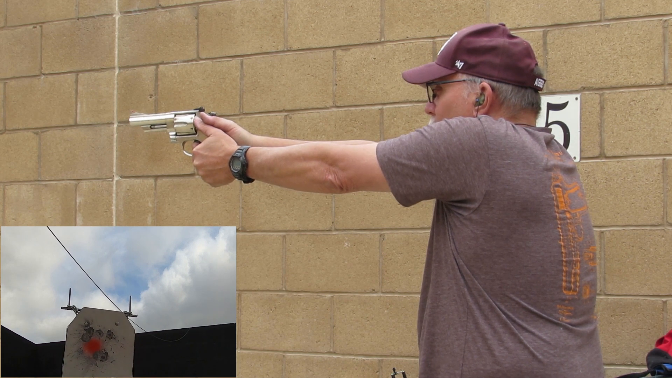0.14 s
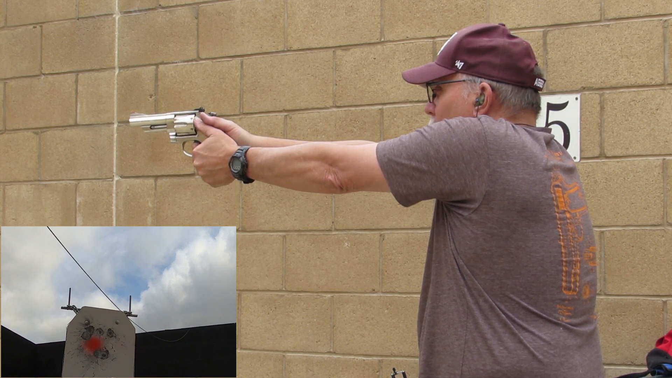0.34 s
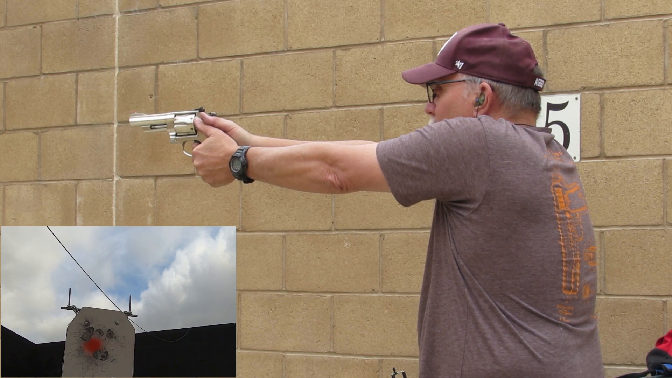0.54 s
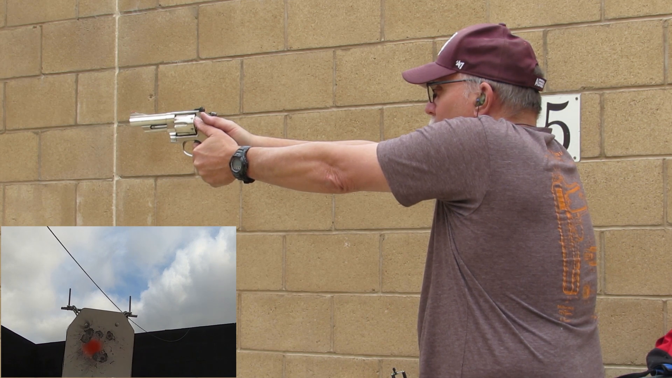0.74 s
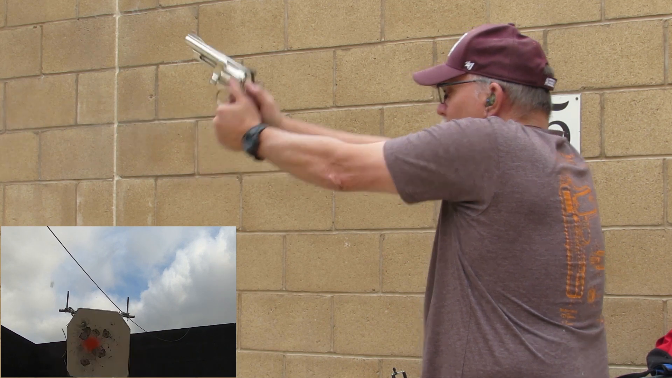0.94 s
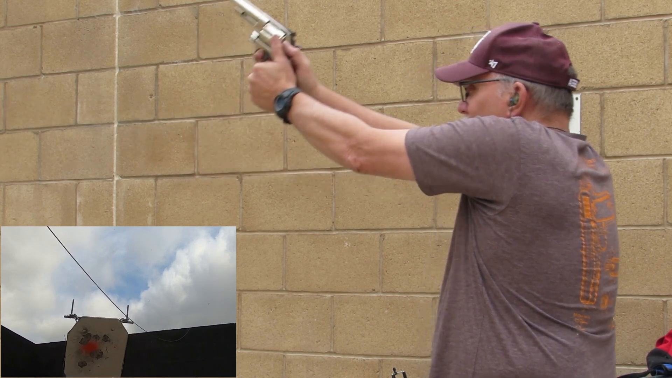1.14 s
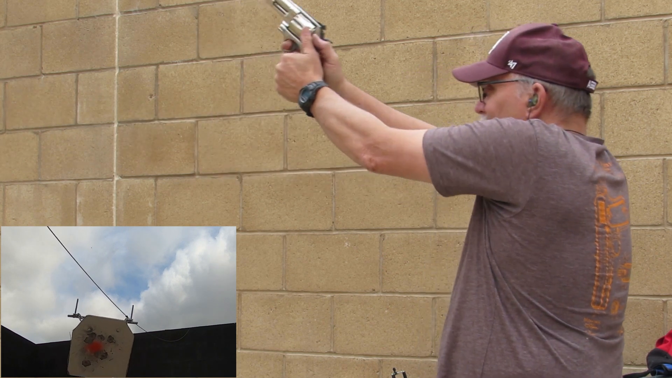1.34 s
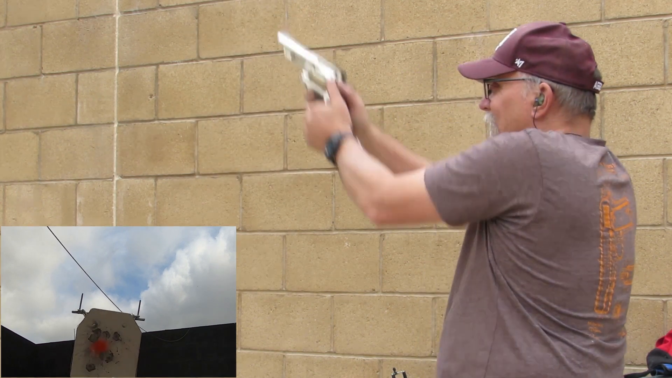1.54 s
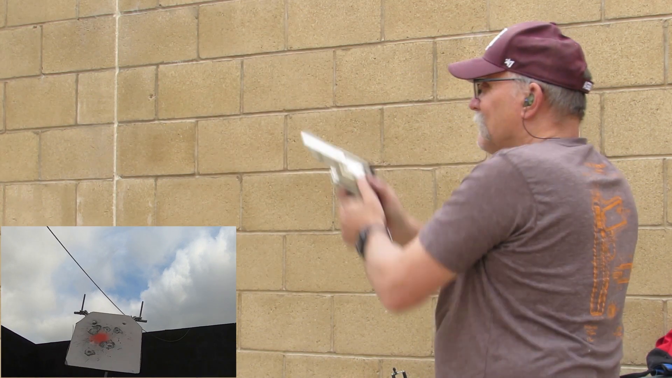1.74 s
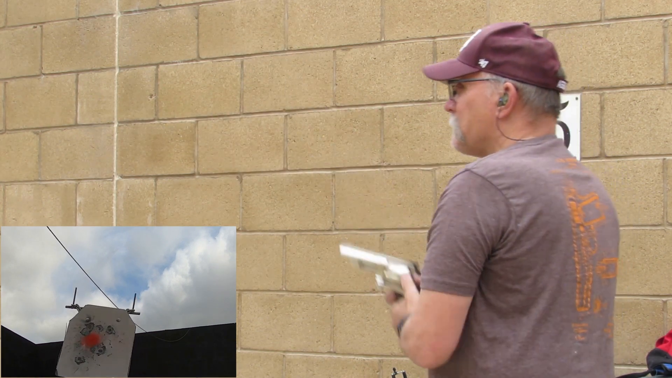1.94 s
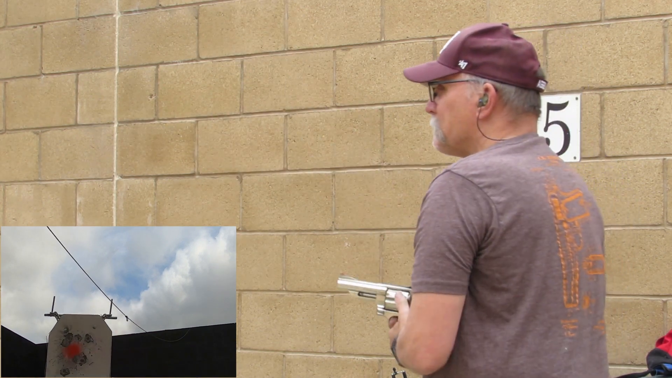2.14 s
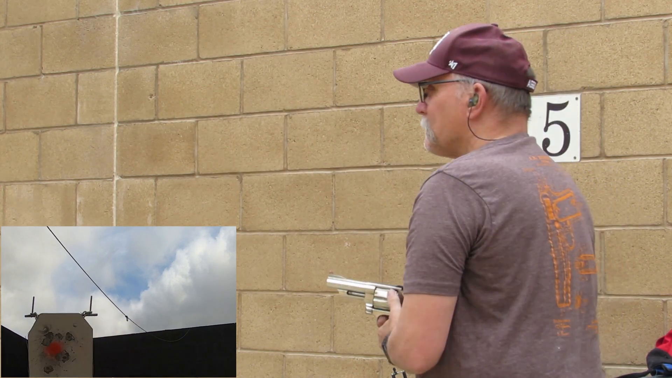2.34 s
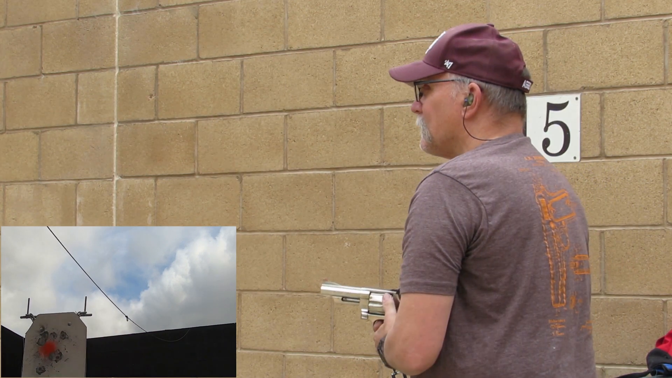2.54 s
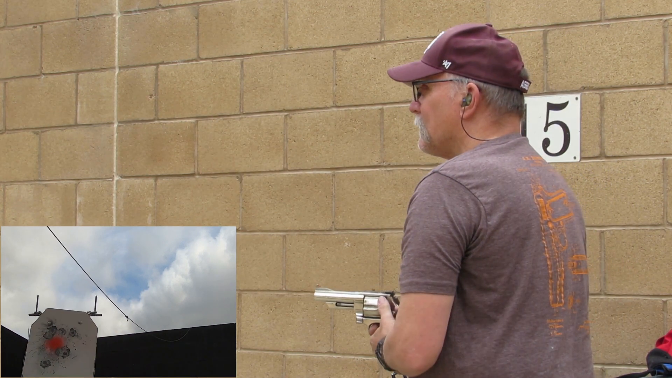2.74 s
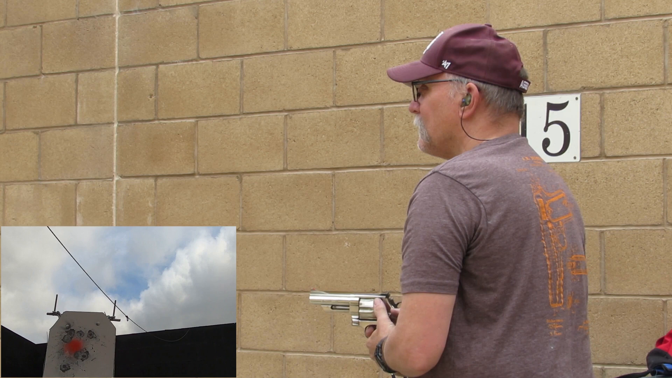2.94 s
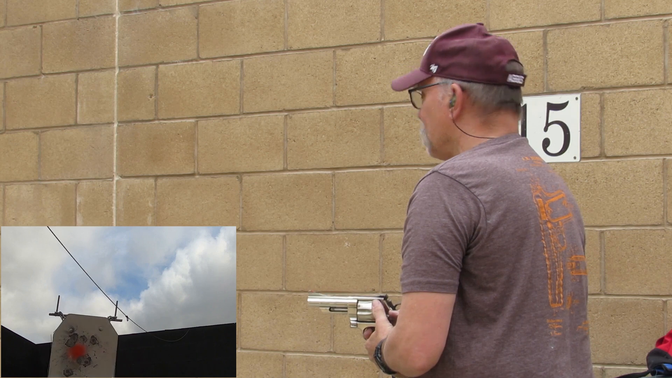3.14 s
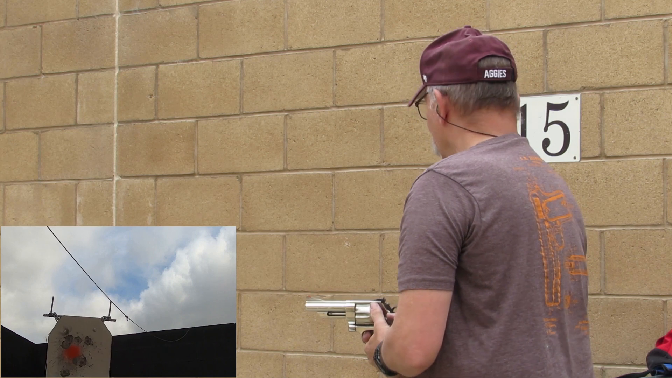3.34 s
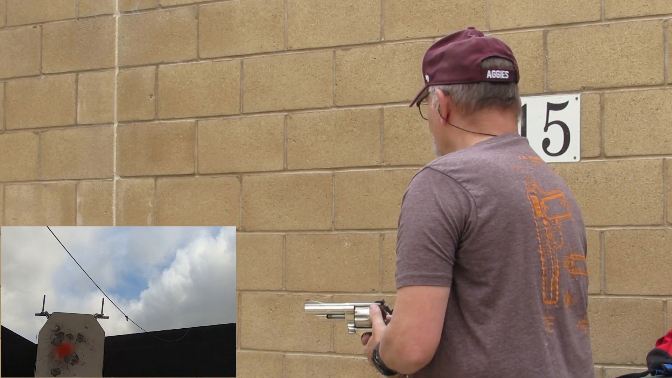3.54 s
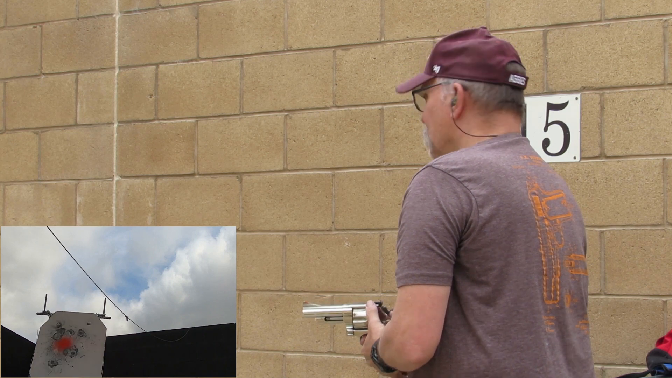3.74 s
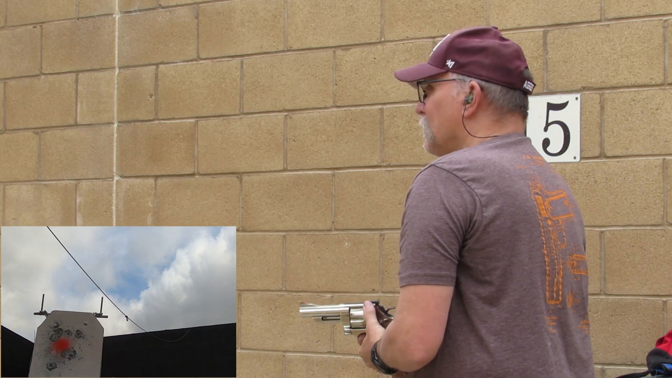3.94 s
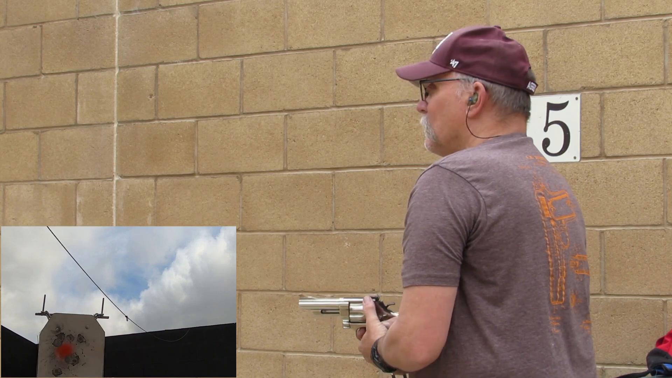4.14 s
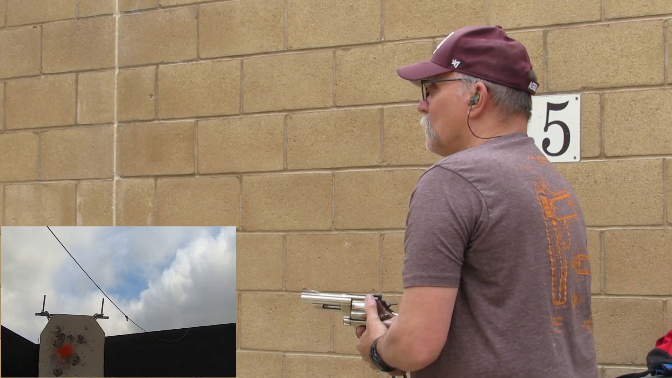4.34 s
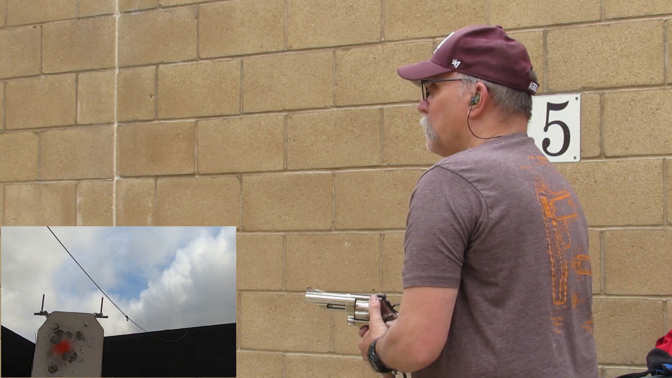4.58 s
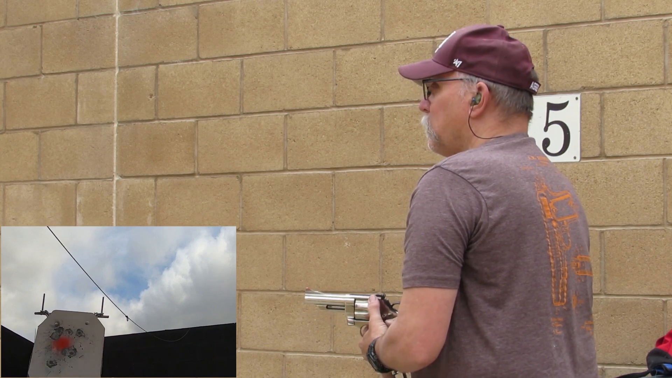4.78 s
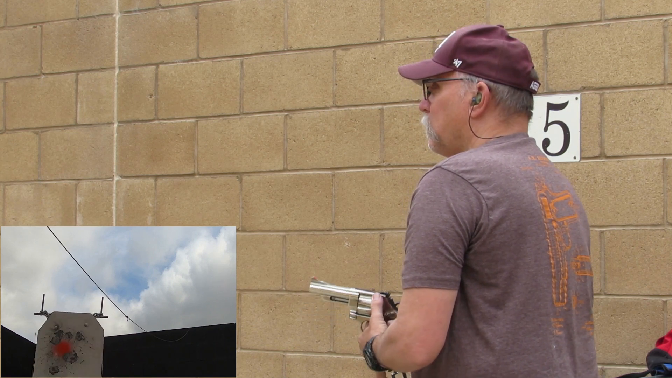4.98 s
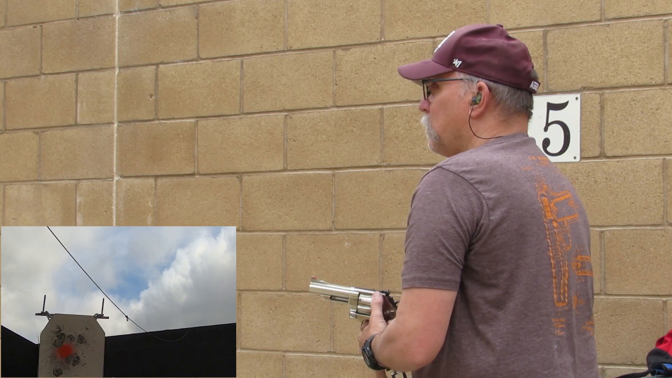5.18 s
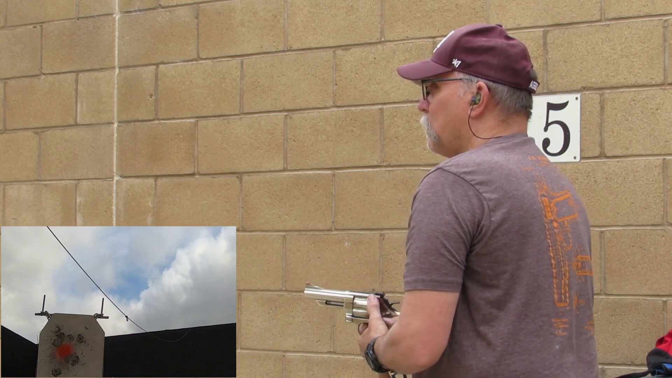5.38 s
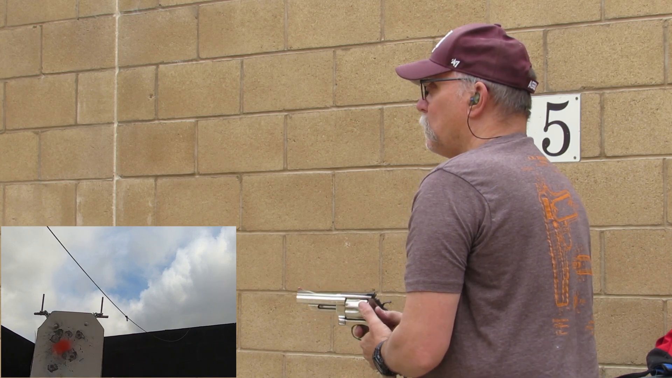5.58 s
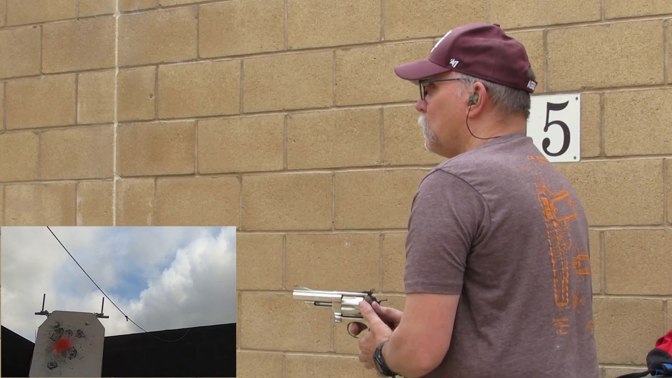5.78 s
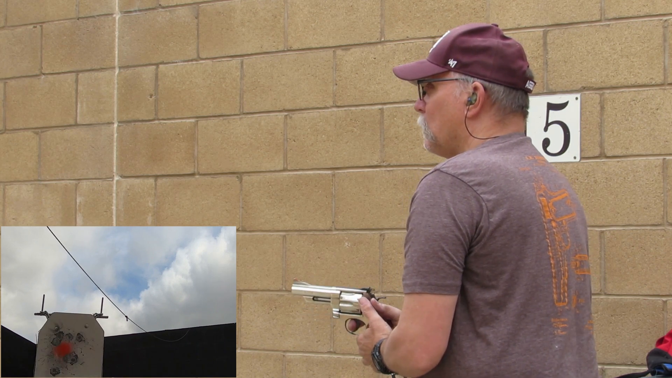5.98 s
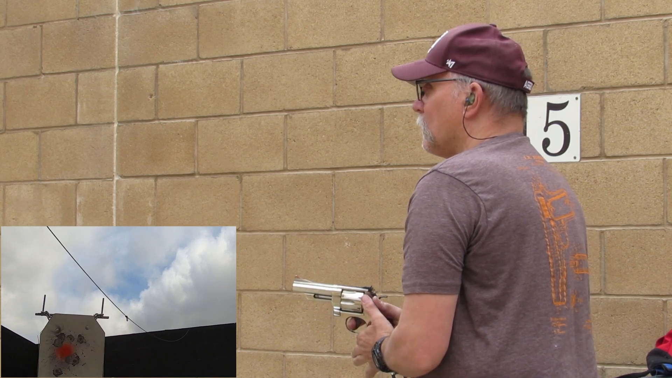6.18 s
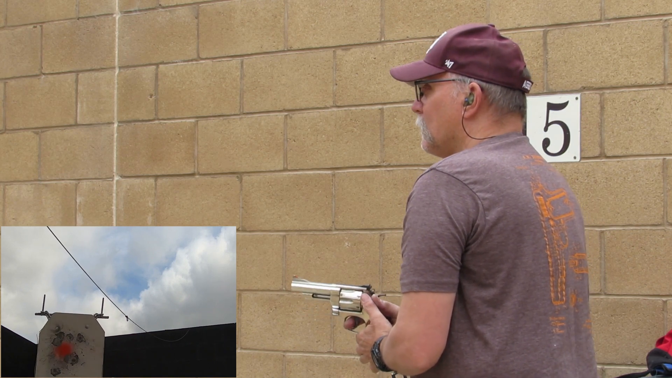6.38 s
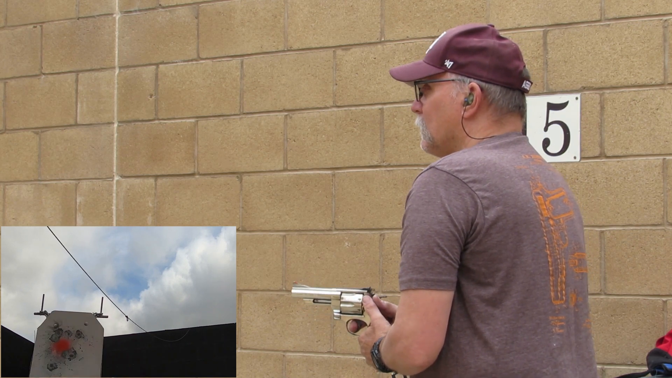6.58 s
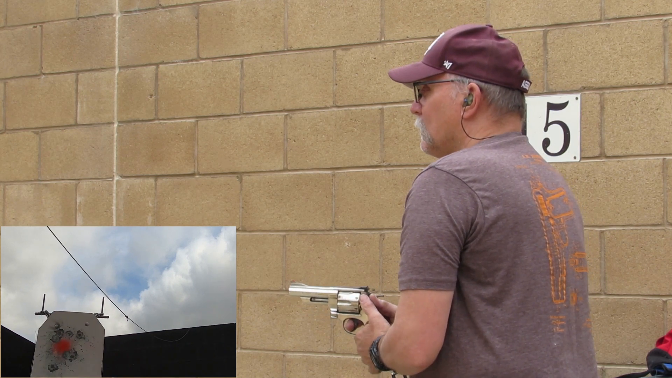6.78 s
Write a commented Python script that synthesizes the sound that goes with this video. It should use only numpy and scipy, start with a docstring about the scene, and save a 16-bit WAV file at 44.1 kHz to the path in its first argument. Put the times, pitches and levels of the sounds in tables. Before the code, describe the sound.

After small metallic clicks, one violent handgun blast slaps off walls, rolls and rings out, leaving fluttering pulses, soft rubbing and distant hum.

```python
"""Far machinery drones over the air's rumble and hiss; a revolver's lock clicks and its hammer falls.
The shot, in a block-walled bay of an outdoor range, overloads the microphone and the background sinks.
After a brief hush come slaps, a wash and a long roll of noise, ringing tones and a gust of stirred air.
Later pulses flutter between the walls, and something rubs and scrapes in fits and squeals once:
perhaps clothing or a holster, made of noise through narrow resonances."""
import sys
import numpy as np
from scipy import signal
from scipy.io import wavfile
from scipy.ndimage import uniform_filter1d

SR = 44100
rng = np.random.default_rng(int(sys.argv[2]) if len(sys.argv) > 2 else 0)


def file_out(sig):
    """Save sig as 16-bit WAV at sys.argv[1]."""
    # one column per channel
    cols = np.atleast_2d(sig).T
    # limit, then scale
    lim = np.clip(cols, -1, 1)
    pcm = np.round(lim * 32767).astype(np.int16)
    wavfile.write(sys.argv[1], SR, pcm)


N = 300762
TIME = np.arange(N) / SR
SHOT_S = 0.7876
ECHO_START_S = 0.868   # wash and roll begin


def from_db(db):
    """Turn decibels into a gain."""
    return 10 ** (np.asarray(db) / 20)


def rms_one(x):
    """Scale a signal to an rms (average strength) of 1."""
    return x / np.sqrt(np.mean(x ** 2) + 1e-20)


def level(rows):
    """Gain over time from rows of seconds and dB; silent outside their span."""
    rows = np.array(rows)
    return from_db(np.interp(TIME, rows[:, 0], rows[:, 1], left=-200, right=-200))


def at_hz(points, hz):
    """Read a table between its rows, on a log-frequency axis."""
    points = np.array(points)
    return np.interp(np.log(hz), np.log(points[:, 0]), points[:, 1])


def cut(x, hz, kind, order=2):
    """Butterworth filter: keep only the low, high or band part."""
    sections = signal.butter(order, np.clip(hz, 10, .47 * SR), kind, fs=SR, output="sos")
    return signal.sosfilt(sections, x + 1e-18)


def resonate(x, hz, width_hz):
    """A two-pole resonance of unit height: the narrower, the longer it rings."""
    r = np.exp(-np.pi * width_hz / SR)
    feed = np.array([1, 0, -1]) * (1 - r * r) / 2
    return signal.lfilter(feed, [1, -2 * r * np.cos(2 * np.pi * hz / SR), r * r], x + 1e-18)


def drift(rate):
    """Random wander of rms 1 that gets a new target `rate` times a second."""
    return rms_one(np.interp(TIME * rate, np.arange(4096), rng.standard_normal(4096)))


def fade(t, t60):
    """Exponential decay from t = 0 that loses 60 dB in t60 seconds."""
    return (t >= 0) * np.exp(-np.log(1000) * np.clip(t / t60, 0, 10))


def pair(two, alike):
    """Turn two unrelated signals into left and right of a given likeness (-1 opposite, 1 same)."""
    alike = np.clip(alike, -.99, .99)
    middle = np.sqrt(1 + alike) * two[0]
    side = np.sqrt(1 - alike) * two[1] * np.array([[1], [-1]])
    return (middle + side) / np.sqrt(2)


def add(out, s, sound):
    """Mix a short sound in at s seconds."""
    i = round(s * SR)
    out[:, i:i + sound.shape[-1]] += sound[..., :N - i]


def noise(colour, likeness, grain_db=0, shape=lambda hz: 1):
    """Half-octave bands of grainy stereo noise; rms 1 before `shape` scales each band."""
    white = rng.standard_normal((2, 2, N)) * rms_one(from_db(grain_db * drift(550)))
    edges = np.geomspace(22, 17000, 21)
    out, power = 0, 0
    for k, band in enumerate(zip(edges, edges[1:])):
        hz = np.sqrt(band[0] * band[1])
        stereo = pair(cut(white[k % 2], band, "band"), at_hz(likeness, hz))
        part = from_db(at_hz(colour, hz)) * stereo
        out = out + part * shape(hz)
        power = power + np.mean(part ** 2)
    return out / np.sqrt(power)


def envelope(start, rise_s, hold_s, sag_db_per_s, fall_db_per_s):
    """Gain that swells, sags until hold_s after its start, then falls away."""
    age = np.maximum(TIME - start, 0)
    sag_db = sag_db_per_s * np.minimum(age, hold_s)
    fall_db = fall_db_per_s * np.maximum(age - hold_s, 0)
    return np.minimum(age / rise_s, 1) ** 2 * from_db(-sag_db - fall_db)


def blast(swing_db=9, recover_s=0.00099, gas_db=-6, gas_t60=0.018,
          puff_db=-12, puff_s=0.0021, suction_db=-30, suction_s=.014):
    """The blast throws the microphone to its stop; shocks and hot gas ride on it, then puff and suction."""
    # Shock fronts from the gun and the nearest surfaces.
    # Each row: start in seconds, strength in dB, length in ms.
    shocks = [(0.788, 7.5, 0.22), (0.789, 1.5, 0.2), (0.7918, -3.5, 0.16), (0.8086, -7, .3),
              (0.8118, -27, 0.45)]
    t = TIME - SHOT_S
    out = -from_db(swing_db) * (t >= 0) * np.exp(-np.abs(t) / recover_s) * np.ones((2, 1))
    gas = cut(pair(rng.standard_normal((2, N)), 0.48), 12000, "low", order=1)
    out += from_db(gas_db) * fade(t, gas_t60) * gas
    for s, db, length_ms in shocks:
        age = np.maximum((TIME - s) * 1000, 0) / length_ms
        # a short push, then a shallow pull
        out += from_db(db) * (age > 0) * np.where(age < 1, 1, -.25 * np.exp(-age / 4))
    for s, db, sign, rise_s in [(0.7992, puff_db, 1, puff_s), (0.8, suction_db, -0.72, suction_s)]:
        # the right side gets it 1.3 ms later
        age = np.maximum(TIME - s - np.array([[0], [.0013]]), 0) / rise_s
        out += sign * from_db(db) * age ** 2 * np.exp(2 - 2 * age)
    return cut(out, 13000, "low", order=1)


def lockwork():
    """Small steel parts snap home and ring briefly: bursts of metal-coloured noise."""
    # Clicks. Each row: start in seconds, relative level in dB, time to fade by 60 dB in seconds.
    clicks = [(0.3493, -26.5, 0.017), (0.359, -36, 0.027), (0.372, -43, 0.06), (0.7805, -21.5, 0.012),
              (0.781, -15.5, 0.023), (0.7848, -21.5, 0.042), (5.502, -48, .06)]
    # Colour of the steel. Each row: frequency in Hz, relative level in dB.
    steel = [(800, -18.5), (2000, -11.5), (3000, 1), (5000, -19), (7500, -10), (10000, -2), (12500, 4),
             (15500, -16)]
    blows = sum(from_db(db - 5.0) * fade(TIME - s, t60) for s, db, t60 in clicks)
    return blows * noise(steel, [(1000, 0.97)])


def thump(t, hz, cycles):
    """A shock rounded by its journey: pressure swells, swings and dies."""
    age = t * hz / cycles
    return np.sin(2 * np.pi * hz * t) * age * np.exp(1 - age)


def slaps(thump_db=-4, cycles=0.4, crack_db=12, crack_s=0.00043, scatter_db=8, scatter_t60=0.012,
          scatter_rise_s=0.0012, blur_per_s2=105, glance_db=-8, glance_s=0.0037):
    """Each surface returns a thump, a sharp front and a spray of scatter; late fronts are weaker."""
    # Echoes from walls and baffles. Each row: start in seconds, relative thump level in dB, thump
    # pitch in Hz, relative crack level in dB, top of the crack in Hz, left minus right in dB.
    echoes = [(0.9023, -24, 144, -26, 13000, -2), (0.905, -6.5, 390, -21, 10000, -3),
              (0.9095, -17, 300, -21, 6000, 3), (0.9128, -10, 300, -19, 12000, -4),
              (0.916, -5, 202, -19, 10000, -1), (0.9202, -13, 248, -22, 6000, -6),
              (0.9235, -17, 80, -13, 15000, 0), (0.926, -13, 570, -16, 9100, -3),
              (0.9307, -14, 190, -13, 9000, -2), (0.963, 0.5, 193, -19, 9000, 1),
              (0.973, -9, 209, -24, 9000, -1), (0.9988, -5, 107, -19, 9000, 2),
              (1.011, -2, 412, -30, 9000, -2), (1.048, -8, 480, -36, 9000, -6),
              (1.051, -13, 85, -7.5, 16200, 13), (1.0597, -7.5, 252, -24, 9000, -13),
              (1.087, -6, 355, -14, 7000, -9.5), (1.0911, -5, 248, -32, 5000, 11),
              (1.0984, -12, 353, -20.5, 7000, -14), (1.124, -8.5, 350, -21, 7000, 13),
              (1.133, -7, 408, -18, 7000, 0), (1.1401, -3.5, 310, -36, 5000, 0),
              (1.1486, -6, 338, -17.5, 5900, 7), (1.1773, -5.5, 340, -13, 6000, -3),
              (1.1878, -22, 298, -16, 5000, -9), (1.2167, -9.5, 384, -28, 6000, 6),
              (1.2275, -7, 384, -11.5, 4800, 6), (1.2386, -5.5, 368, -16, 4850, 3.5),
              (1.245, -12, 302, -34, 4000, 0), (1.268, -8, 340, -11, 8850, -7),
              (1.279, -21, 403, -14.5, 8400, -9), (1.308, -12, 350, -24, 5000, -1),
              (1.317, -19, 318, -13.5, 5950, 8), (1.3287, -18, 405, -10, 3430, 4),
              (1.358, -16, 367, -14, 5000, -3), (1.3693, -21, 368, -10.5, 5160, -5),
              (1.3728, -19, 370, -15, 6000, -5), (1.399, -14, 304, -13, 5700, -1),
              (1.408, -14, 328, -16, 4000, 6), (1.4201, -31, 355, -15.5, 3500, 1),
              (1.427, -17, 356, -29, 4000, 0), (1.45, -24, 400, -22, 5000, -5),
              (1.460, -31, 400, -19, 3500, -7), (1.470, -32, 400, -19, 6000, 0),
              (1.492, -19, 350, -36, 4000, 3), (1.503, -17.5, 375, -24, 4000, 6),
              (1.527, -20, 377, -16, 5100, 4), (1.5524, -27, 406, -18, 4000, -2),
              (1.5928, -20, 400, -26, 4000, 7), (1.609, -16, 380, -38, 3000, 0),
              (1.643, -34, 380, -31, 3500, 0)]
    out, t = np.zeros((2, N)), TIME[:SR // 10]
    for s, db, hz, front_db, top_hz, pan_db in echoes:
        blurred = from_db(crack_db - blur_per_s2 * (s - 0.92) ** 2)
        front = (1 - t / crack_s) * np.exp(-t / crack_s) * blurred
        scatter = pair(rng.standard_normal((2, len(t))), 0.24)
        scatter = scatter * fade(t, scatter_t60) * np.minimum(t / scatter_rise_s, 1)
        scatter = from_db(scatter_db) * cut(scatter, [750, 2300], "band", order=1)
        crack = cut(from_db(front_db) * (front + scatter), top_hz, "low", order=4)
        boom = from_db(db + thump_db) * thump(t, hz, cycles)
        add(out, s, (crack + boom) * from_db(np.array([[.5], [-.5]]) * pan_db))
        # a second, glancing path brings the thump again, wide and a little later
        wide = boom * np.array([[1], [-1]]) * rng.choice([-1, 1])
        add(out, s + glance_s * rng.uniform(1.0, 1.26), from_db(glance_db) * wide)
    return out


def wash_level():
    """The wash swells, peaks as the bay's first reflections meet, holds briefly and dies fast."""
    focus = from_db(-16) * np.exp(-((TIME - 0.928) / 0.013) ** 2)
    rise_s, hold_s = 0.043, 0.083
    swell = envelope(ECHO_START_S, rise_s, rise_s + hold_s, 0, fall_db_per_s=147)
    return focus + from_db(-21) * swell


def wash(wall_echo=0.66, count=5, bay_trip_s=0.01065):
    """Countless small echoes as grainy noise, made hollow by short bounces across the bay."""
    # Colour. Each row: frequency in Hz, relative level in dB.
    colour = [(25, -7.5), (120, -15), (190, -3), (270, -8.5), (400, -10), (700, -13), (950, -24.5),
              (1400, -14.5), (2000, -17), (2900, -18.5), (5000, -31), (8200, -20.5), (11000, -47.5),
              (15000, -64)]
    # Stereo. Each row: frequency in Hz, left-right likeness (-1 to 1).
    likeness = [(50, -0.018), (130, 1), (290, 1), (640, 0.31), (1400, 0.11), (3100, 0.45), (8000, 0.6),
                (13000, 0.72)]
    spray = noise(colour, likeness, grain_db=4.5)
    # each bounce is a weaker, upside-down copy of the one before
    bounces = sum((-wall_echo) ** k * np.roll(spray, round(k * bay_trip_s * SR), axis=1)
                  for k in range(count))
    return wash_level() * rms_one(bounces)


def roll_level():
    """The roll sags slowly at first, then falls faster into a faint, long tail."""
    rise_s = 0.11
    near = from_db(-22.5) * envelope(ECHO_START_S, rise_s, 0.61, sag_db_per_s=10.5, fall_db_per_s=40)
    # far surroundings keep answering
    tail = from_db(-37.5) * envelope(ECHO_START_S, rise_s, 0, 0, fall_db_per_s=11.5)
    return np.hypot(near, tail)


def roll(lump_db=1.86, lumps_per_s=110):
    """Far echoes arrive in clusters as noise that loses its deep bass first and excites resonances."""
    # Colour. Each row: frequency in Hz, relative level in dB.
    colour = [(25, -38), (70, -19), (115, -1.5), (180, -5.5), (260, -5), (360, -3), (500, -4), (950, -9.5),
              (1450, -9.5), (2100, -20.5), (3000, -19.5), (5200, -31.5), (8500, -37.5), (15000, -100)]
    # Stereo. Each row: frequency in Hz, left-right likeness (-1 to 1).
    likeness = [(50, .1), (130, 1), (290, 1), (640, 0.45), (1400, 0.27), (3100, 0.68), (14000, 0.24)]
    # Extra fading. Each row: frequency in Hz, loss in dB per second.
    loss = [(40, 46), (90, 37), (180, 1), (400, -4), (700, 0.5), (1500, 0.5), (3000, -2), (4200, 6),
            (6000, 12), (14000, -4)]
    # Resonances. Each row: frequency in Hz, width in Hz, relative level in dB.
    rings = [(181, 14, 1), (265.6, 12, 5.5), (340, 10.4, 3.5), (429, 7.9, 0), (447.4, 8.8, 0),
             (2830, 200, -2), (3190, 220, -2.5)]
    age = np.clip(TIME - 1.3, -.3, 1.5)   # the extra fading runs from 1.0 to 2.8 s
    far = noise(colour, likeness, grain_db=0.5, shape=lambda hz: from_db(-at_hz(loss, hz) * age))
    far = roll_level() * far
    ringing = sum(from_db(db) * resonate(far, hz, width) for hz, width, db in rings)
    lumps = rms_one(from_db(lump_db * drift(lumps_per_s)))
    return (far + ringing) * lumps


def standing_waves(modes_db=-2, split_hz=3.22, build_s=0.0071):
    """Each standing wave of the bay rings as two close tones that beat slowly."""
    # Frequency of each standing wave in Hz.
    mode_hz = [104, 141, 186, 235, 268, 329, 340, 425, 447, 515, 606, 703, 882, 1173, 1509, 1640, 2299,
               2850, 3330, 4168]
    # One row for each frequency: relative level in dB, time to fade by 60 dB in seconds.
    modes = [(-24, 1.43), (-18, 0.32), (-25.5, 2.67), (-21, 0.24), (-41, 1.9), (-18, 0.27), (-33, 2.3),
             (-25, 2.25), (-39, 2.4), (-22.5, 0.34), (-38, 1.6), (-20, 0.49), (-35, .7), (-32, 0.55),
             (-24.5, 0.78), (-25, 0.29), (-29, 0.81), (-23, 0.4), (-25.5, 0.18), (-36, .45)]
    t, out = TIME[:3 * SR], np.zeros((2, N))
    for hz, (db, t60) in zip(mode_hz, modes):
        # left and right start at almost the same phase
        phase = rng.uniform(0, 2 * np.pi, (2, 1, 1)) + rng.normal(0, 0.058, (2, 2, 1))
        tones = np.sin(2 * np.pi * hz * t + phase[0])
        tones = tones + .5 * np.sin(2 * np.pi * (hz + split_hz) * t + phase[1])
        add(out, 0.893, from_db(db + modes_db) * tones * fade(t, t60) * np.minimum(t / build_s, 1))
    return out


def gust(at_s=1.1, gust_db=-19, width_s=0.062):
    """Air stirred by the shot buffets the microphone, pushing its two sides against each other."""
    # Colour. Each row: frequency in Hz, relative level in dB.
    colour = [(25, 2), (60, 0), (110, -7), (220, -30), (600, -70), (2000, -120)]
    swell = np.exp(-((TIME - at_s) / width_s) ** 2)
    return from_db(gust_db) * swell * noise(colour, [(100, -0.85)])


def flutter(scatter=0.018, scatter_growth=0.2, scatter_t60=0.12, narrowing=0.063, count=16,
            round_trip_s=0.0916):
    """Two pulses bounce between facing walls; each round is duller, more smeared and more ringing."""
    # First return of each path in seconds.
    starts = [1.6741, 1.7008]
    # Colour. Each row: frequency in Hz, base width in Hz, first peak in dB, loss per round in dB.
    tones = [(180, 28, -38, 0.64), (269, 50, -38, 1.7), (350, 58, -32, 1.1), (419, 65, -28, 2.2),
             (650, 780, -43, 0.5), (1510, 550, -44, 5)]
    out, t = np.zeros((2, N)), TIME[:SR // 8]
    for s in starts:
        # every round repeats the same scatter, a little stronger
        spray = scatter * pair(rng.standard_normal((2, len(t))), 0.68) * fade(t, scatter_t60)
        for k in range(count):
            bounce = (t == 0) + (1 + scatter_growth * k) * spray
            for hz, width, db, loss_db in tones:
                narrowed = 2 * width / (1 + narrowing * k)
                pulse = resonate(resonate(bounce, hz, narrowed), hz, narrowed)
                pulse = pulse / np.abs(pulse).max()
                add(out, s + k * round_trip_s, from_db(db - k * loss_db) * pulse)
    return out


def scraping(rasp_db=-2.5, hiss_db=-2.2, jerk_db=1.86, surge_db=0.8,
             catch_db=-7, catch_hiss_db=-15, catch_t60=0.034, catch_rise_s=0.0029):
    """Uneven stick and slip hisses and drives body resonances; now and then it catches."""
    # Body resonances. Each row: frequency in Hz, base width in Hz, relative level in dB.
    resonances = [(1010, 28, -25), (1526, 50, -5), (1960, 170, -5), (2732, 202, 8.5), (2886, 100, 4),
                  (2948, 146, 7), (3187, 98, 1), (3440, 180, -4.5)]
    # Strokes. Each row: start in seconds, length in seconds, relative rasp and hiss levels in dB.
    stroke_rows = [(1.598, 0.048, -54, -44), (1.66, 0.08, -44, -44), (1.76, 0.14, -51.5, -60.5),
                   (2.008, 0.05, -54, -57), (2.072, 0.078, -44.5, -50.5), (2.189, 0.045, -46, -54),
                   (2.305, 0.2, -61, -72), (2.53, 0.25, -60, -63.5), (2.738, 0.3, -42, -48.5),
                   (3.402, 0.059, -46.5, -52.5), (3.458, 0.084, -40.5, -49.5), (3.56, 0.087, -43, -55),
                   (3.65, 0.099, -50.5, -69), (3.849, 0.028, -46, -52.5), (4.408, 0.041, -53.5, -76)]
    # Catches. Each row: start in seconds, relative level in dB.
    catch_rows = [(2.0, -33.5), (2.024, -37.5), (2.091, -40), (2.16, -36), (2.222, -36), (2.247, -36),
                  (2.378, -46.5), (2.492, -37), (2.545, -34.5), (2.724, -37), (2.817, -35), (2.834, -25),
                  (2.843, -25), (2.869, -31), (2.898, -38), (2.922, -33), (2.982, -35), (3.1177, -40),
                  (3.488, -41), (3.496, -39), (3.544, -38), (3.614, -27.5), (3.621, -33), (3.7156, -27.5),
                  (3.728, -36), (3.93, -39.5)]
    # Colour of the hiss. Each row: frequency in Hz, relative level in dB.
    hiss_colour = [(900, 8), (2000, -3), (4000, -4), (5200, 3), (7500, 2), (9300, -1.5), (11000, -6.5),
                   (12600, 0), (14500, -28)]
    slips = rms_one(from_db(jerk_db * drift(260) + surge_db * drift(45)))
    grit = pair(rng.standard_normal((2, N)), 0.74)
    body = 0
    for k, (hz, width, db) in enumerate(resonances):
        ring = resonate(resonate(grit, hz, 1.7 * width), hz, 1.7 * width)
        body = body + from_db(db) * ring * (-1) ** k
    body = rms_one(body)
    strokes = np.array([
        from_db([[rasp], [hiss]]) * envelope(s, 0.021, length, sag_db_per_s=4, fall_db_per_s=135)
        for s, length, rasp, hiss in stroke_rows])
    rasp_level, hiss_level = strokes.max(axis=0)
    catches, t = np.zeros((1, N)), TIME[:SR // 5]
    for s, db in catch_rows:
        catch = fade(t, catch_t60) * np.minimum(t / catch_rise_s, 1)
        add(catches, s, from_db(db + catch_db) * catch)
    rasp = from_db(rasp_db) * rasp_level * slips
    hiss = from_db(hiss_db) * hiss_level * slips + from_db(catch_hiss_db) * catches
    return body * (rasp + catches) + hiss * noise(hiss_colour, [(3000, 0.35), (12000, 1.0)], grain_db=2.0)


def squeal(start_s=1.655, rise_s=0.034, hold_s=0.06, squeal_db=-47, fall_db_per_s=130):
    """During an early, hissy stroke a cluster of thin tones squeals once."""
    # Tones. Each row: frequency in Hz, base width in Hz, relative level in dB.
    squeal_tones = [(5460, 18, -2), (5650, 20, -7), (5880, 25, -3), (6780, 30, -1), (7060, 32, 0),
                    (7690, 30, -1), (7855, 20, -1), (9400, 30, -6)]
    tones = rms_one(sum(from_db(db) * hum(hz, width, 0.38) for hz, width, db in squeal_tones))
    return from_db(squeal_db) * envelope(start_s, rise_s, hold_s, 0, fall_db_per_s) * tones


def lean(hz):
    """Place a frequency a little to the left or right by setting the two sides' levels."""
    # Each row: frequency in Hz, left minus right in dB.
    balance = [(100, 0), (380, -1.5), (700, -5), (1300, -2), (2400, 1.5), (8000, 0)]
    return from_db(np.array([[.5], [-.5]]) * at_hz(balance, hz))


def hum(hz, width_hz, alike):
    """Narrow noise heard as a tone: it flickers quickly but its 0.2 s average level stays even."""
    tone = pair(rng.standard_normal((2, N)), alike)
    tone = resonate(resonate(tone, hz, 2 * width_hz), hz, 2 * width_hz)
    power = uniform_filter1d(np.mean(tone ** 2, axis=0), size=SR // 5)
    return lean(hz) * tone / np.sqrt(power + 1e-20)


def air_level(hush_depth_db=26.5, hush_s=0.095, recover_db_per_s=55, sunk_depth_db=14):
    """The background drops away at the shot, then stays low under the echoes and creeps back."""
    age = np.maximum(TIME - SHOT_S, 0)
    hush_db = np.minimum(hush_depth_db * age / hush_s,
                         hush_depth_db - recover_db_per_s * (age - hush_s))
    # a broad dip, deepest at 1.97 s
    sunk_db = sunk_depth_db * (age > 0) * np.exp(-((TIME - 1.97) / 1.16) ** 2)
    return from_db(-np.maximum(hush_db, sunk_db))


def background(air_db=-46.5, drone_db=-2, rumble_top_hz=160):
    """Rumble and hiss of open air as noise; far machinery as narrow drones and passing whines."""
    # Colour of the air. Each row: frequency in Hz, relative level in dB.
    air_colour = [(22, -5), (45, 3.5), (80, -0.5), (130, -7), (200, -10.5), (340, -18.5), (450, -16.5),
                  (650, -23), (1100, -17.5), (1500, -24.5), (3300, -27.5), (5800, -31.5), (7500, -30),
                  (12000, -37), (15500, -51)]
    # Stereo. Each row: frequency in Hz, left-right likeness (-1 to 1).
    likeness = [(50, 0.91), (130, 0.23), (290, -0.91), (640, -1), (1400, -0.22), (3100, -0.47),
                (6800, 0.98), (12000, 1)]
    # The drone eases and grows again. Each row: time in seconds, level in dB.
    swell_rows = [(0, 4), (0.8, 2), (4.1, 0), (4.6, 3.5), (5.2, 5), (6.1, 4), (6.82, 2)]
    # How far the air follows that swell. Each row: frequency in Hz, share from 0 to 1.
    swell_share = [(150, 0), (330, 0.87), (1300, 0.7), (4000, 0.45), (12000, 0.62)]
    # Extra level of the deep rumble. Each row: time in seconds, level in dB.
    rumble_rows = [(0, 4.5), (0.8, 3), (3, 0.5), (4.9, -1.5), (6.1, 1.5), (6.82, 0)]
    # Narrow dips in the hiss. Each row: frequency in Hz, width in Hz.
    dips = [(3950, 320), (7980, 250)]
    # Narrow drones that ease and grow with the swell.
    # Each row: frequency in Hz, base width in Hz, relative level in dB.
    drones = [(68.8, 19.3, -51), (126, 19, -54), (531, 16.4, -50.5), (740, 40, -58.5), (962.4, 19, -57),
              (1005, 48, -56), (12690, 40, -82.5)]
    # Faint passing whines, hums and a squeak.
    # Each row: start in seconds, end in seconds, frequency in Hz, base width in Hz, level in dB.
    whine_rows = [(2.65, 3.17, 1065, 17, -56.5), (3.58, 3.725, 1065, 22, -53.5), (2.06, 4.5, 610, 7.9, -62),
                  (3.82, 4.12, 526, 13, -53), (3.82, 4.13, 606, 6.3, -53), (3.883, 3.9, 6950, 270, -48.5),
                  (3.38, 3.75, 258, 89, -53), (4.98, 5.45, 300, 115, -52.5), (5.6, 6.1, 290, 106, -51.5)]
    swell, rumble = level(swell_rows), level(rumble_rows)

    def band_level(hz):
        """Movement and left-right balance of one band of air."""
        deep = rumble if hz < rumble_top_hz else 1
        follow = swell ** np.clip(at_hz(swell_share, hz), 0, 2)
        # lift bands whose two sides would cancel in a mono mix
        mono_lift = np.sqrt(2 / (1 + np.clip(at_hz(likeness, hz), -.9, 1)))
        return deep * follow * lean(hz) * mono_lift

    air = noise(air_colour, likeness, shape=band_level)
    for hz, width in dips:
        air = air - resonate(air, hz, width)
    air = cut(air, 15200, "low", order=8)
    drone = swell * sum(from_db(db) * hum(hz, width, at_hz(likeness, hz) / 2)
                        for hz, width, db in drones)
    whines = 0
    for start, end, hz, width, db in whine_rows:
        passing = np.sqrt(np.sin(np.pi * np.clip((TIME - start) / (end - start), 0, 1)))
        whines = whines + from_db(db) * passing * hum(hz, width, 0.37)
    return air_level() * (from_db(air_db) * air + from_db(drone_db) * drone) + whines


def scene():
    """Sum the gun, the range's answer and the surroundings."""
    gun = blast() + lockwork()
    answer = slaps() + wash() + roll() + standing_waves() + gust() + flutter()
    return gun + answer + scraping() + squeal() + background()


def record(dry):
    """The input overloads smoothly at full scale, then a steep filter cuts the top."""
    clipped = dry / (1 + dry ** 6) ** (1 / 6)
    # 70 dB down from 16500 Hz upwards
    return signal.sosfilt(signal.cheby2(20, 70, 16500, fs=SR, output="sos"), clipped)


dry = scene()
out = record(dry)
file_out(out)
```